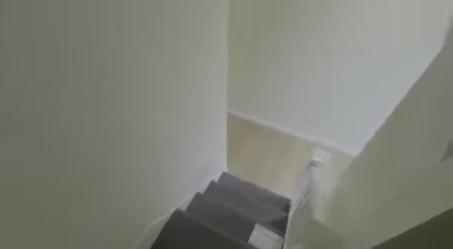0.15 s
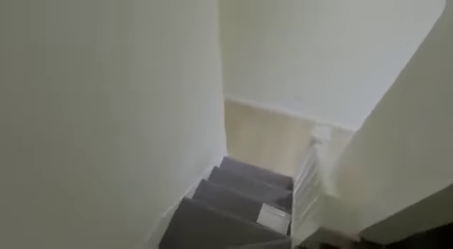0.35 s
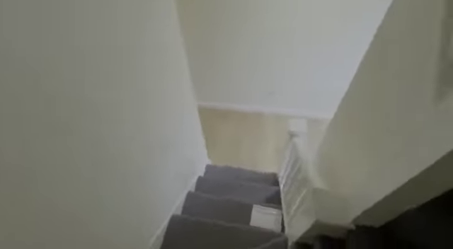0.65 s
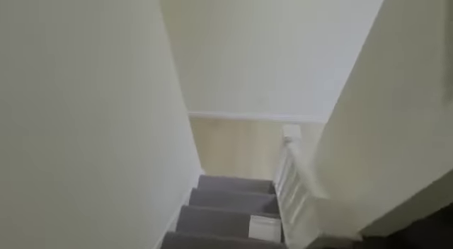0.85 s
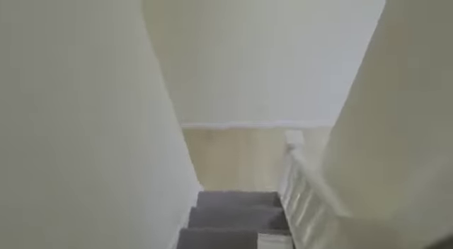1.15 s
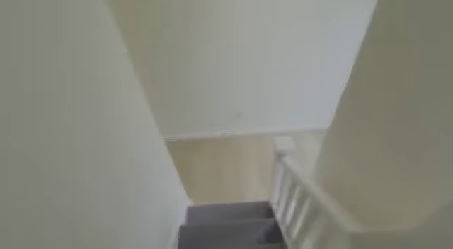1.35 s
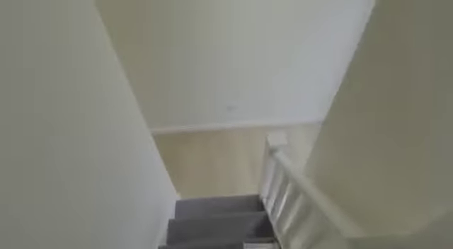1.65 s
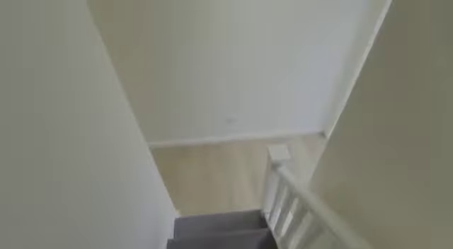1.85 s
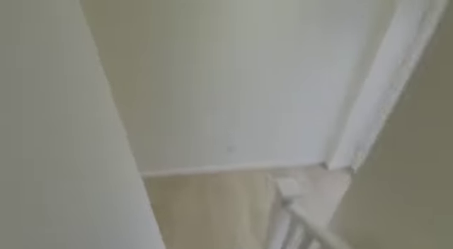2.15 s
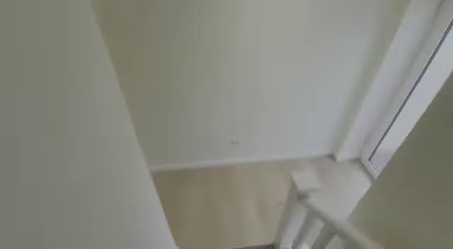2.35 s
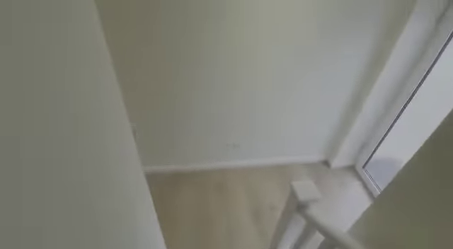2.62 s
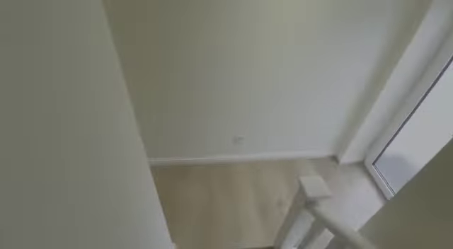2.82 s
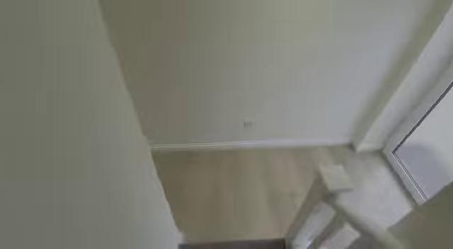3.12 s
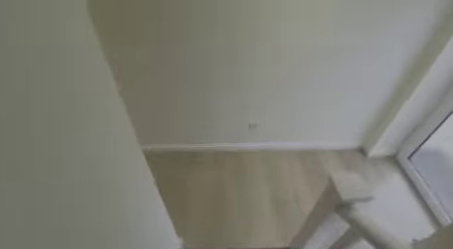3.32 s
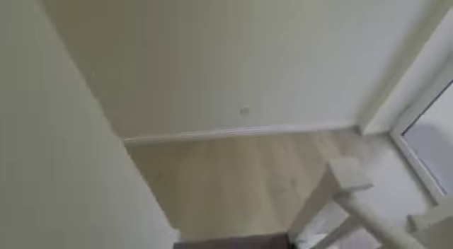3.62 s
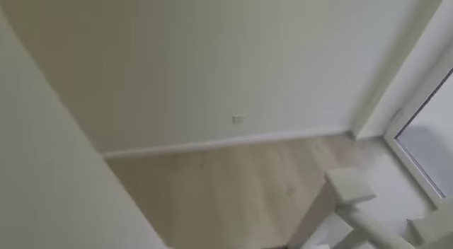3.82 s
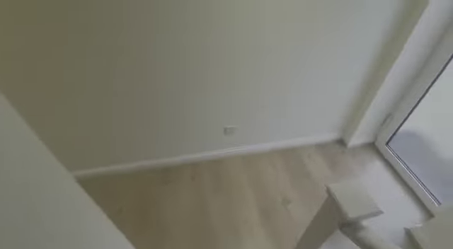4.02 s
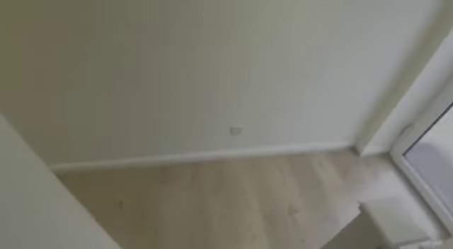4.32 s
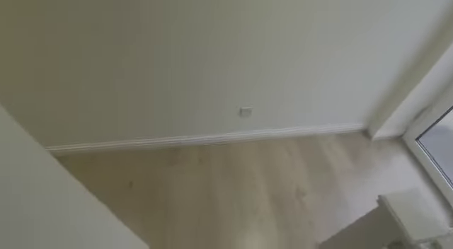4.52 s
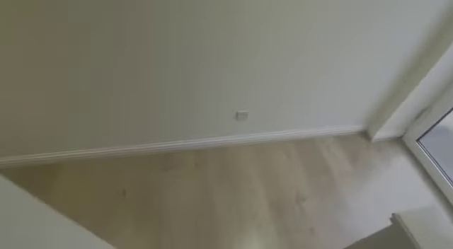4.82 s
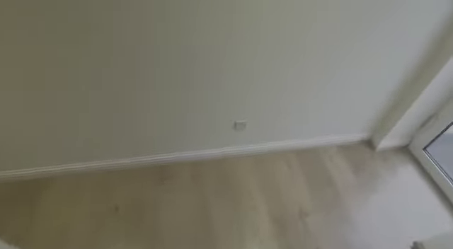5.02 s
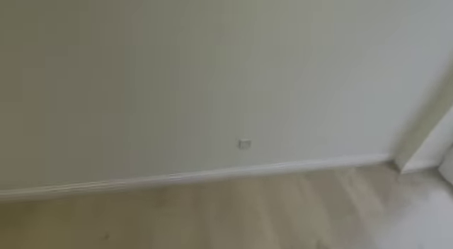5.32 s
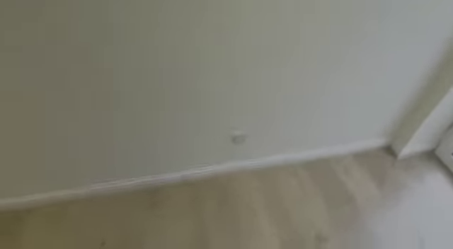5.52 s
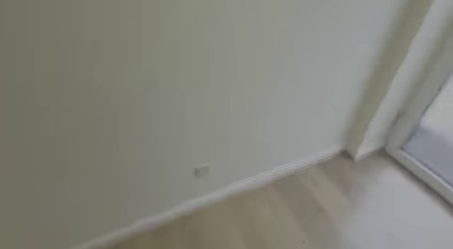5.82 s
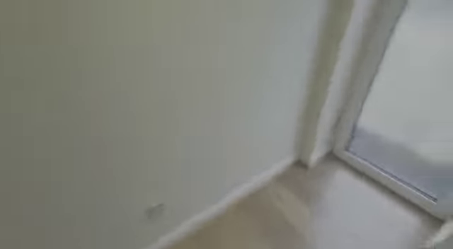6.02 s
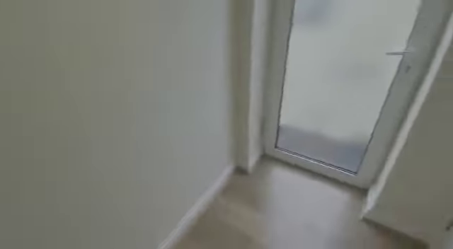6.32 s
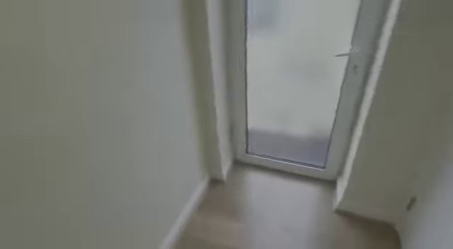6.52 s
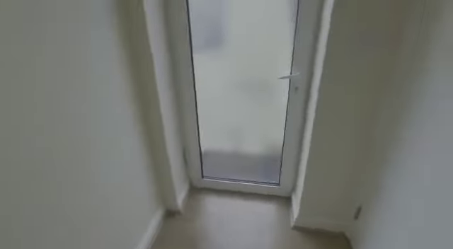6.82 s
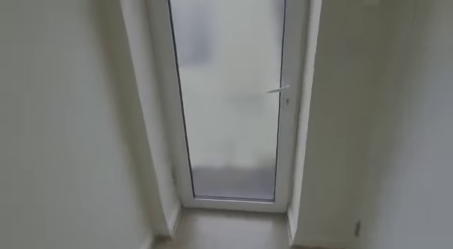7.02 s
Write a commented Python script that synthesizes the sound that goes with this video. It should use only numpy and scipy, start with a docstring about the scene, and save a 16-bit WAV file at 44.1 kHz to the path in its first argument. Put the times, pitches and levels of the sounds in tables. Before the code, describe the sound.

Slow heavy soft-soled footsteps thud down hollow carpeted wooden stairs, with cloth swish between them, then knock onto a hard floor in a bare, echoing hallway.

```python
"""Someone walks down carpeted wooden stairs into a bare hallway, carrying two microphone ports.
Each toe or heel contact sums a swinging thud, a board knock, timber ring, an air slap and a noisy crack,
and excites octave-band noise tails of the hall. Shifting weight drives the timber modes with noise;
cloth and carpet swish as grainy coloured noise; a sole squeaks; quiet house and microphone hiss lie beneath."""
import sys
import numpy as np
from scipy import signal
from scipy.fft import rfft, irfft, next_fast_len
from scipy.io import wavfile
from scipy.ndimage import uniform_filter1d

SR = 44100
rng = np.random.default_rng(int(sys.argv[2]) if len(sys.argv) > 2 else 0)


def unload_wav(signal):
    """Save mono or channel-first audio to the path in sys.argv[1] as 16-bit WAV at rate SR, clipped to [-1, 1]."""
    wavfile.write(
        sys.argv[1],
        SR,
        np.round(np.clip(np.atleast_2d(signal).T, -1, 1) * 32767).astype(np.int16),
    )


N = 315315
HALLWAY_S = 5.6  # the walker is off the stairs from here


def undb(db):
    """Gain of a level in dB."""
    return 10 ** (np.asarray(db) / 20)


def unit(x):
    """Scale to rms 1."""
    return x / np.sqrt(np.mean(x ** 2))


def peak(x, db):
    """Scale to a peak level."""
    return undb(db) * x / np.abs(x).max()


def add(out, x, s):
    """Mix x into out from time s."""
    i = int(s * SR)
    out[..., i:i + x.shape[-1]] += x[..., :out.shape[-1] - i]


def colour(x, table, share=1):
    """Filter by (f/Hz, level/dB) points joined on a log-frequency axis; share scales the dB."""
    hz, db = np.transpose(table)
    size = next_fast_len(x.shape[-1] + 4096, True)
    bins_hz = np.maximum(np.arange(size // 2 + 1) * SR / size, 1)
    gain = undb(share * np.interp(np.log(bins_hz), np.log(hz), db))
    return irfft(rfft(x, size) * gain, size)[..., :x.shape[-1]]


def spread(mid, side):
    """Two ports share the bass and hear unrelated treble: side enters with opposite signs."""
    # port difference relative to the shared part: f/Hz, level/dB
    apart = [(60, -10.5), (110, -23.5), (200, -8), (380, -8), (700, -3.5), (1290, 1), (2380, 0),
             (4400, 0.5), (8120, 0.5), (15000, 0)]
    return mid + colour(side, apart) * np.array([[1], [-1]])


def swell_in(t, rise_s):
    """Exponential rise from 0 to 1."""
    return 1 - np.exp(-t / rise_s)


def walk(rate_hz):
    """Random levels held 1 / rate_hz and slewed twice; rms 1."""
    k = int(SR / rate_hz)
    held = np.repeat(rng.standard_normal(N // k + 1), k)
    slewed = uniform_filter1d(uniform_filter1d(held, k), k)
    return unit(slewed[:N])


def swells(start_s, hold_s, rise_db_s, fall_db_s, level_db, rest_db):
    """Gain over time: every event rises to its level by its start, holds and fades; powers add."""
    t = np.arange(0, N + 64, 64)[:, None] / SR
    before_s = np.maximum(start_s - t, 0)
    after_s = np.maximum(t - start_s - hold_s, 0)
    drop_db = rise_db_s * before_s + fall_db_s * after_s
    gain = np.sqrt((undb(level_db - drop_db) ** 2).sum(1) + undb(rest_db) ** 2)
    return np.interp(np.arange(N) / SR, t[:, 0], gain)


def hall(gap_s, early_db, early_s):
    """Returns a maker of echo tails, a new one for each spot: every octave of noise dies at its own pace."""
    # hall reverberation by octave: f/Hz, t60/s
    octave_decays = [(31, 0.24), (62, 0.45), (125, 0.43), (250, 0.49), (500, 0.49), (1000, 0.56),
                     (2000, 0.59), (4000, 0.73), (8000, 0.65), (16000, 0.059)]
    t = np.arange(SR * 5 // 8) / SR
    ratios = [1 / 2, 1 / 1.8, 1 / 1.41, 1 / 1.2, 1, 1.2, 1.41, 1.8, 2]
    skirt_db = [-60, -13, -3, -.8, 0, -.8, -3, -13, -60]
    # close walls answer first, in a dense cluster above the long tail
    early = undb(early_db) * np.exp(-t / early_s)
    octaves, fades = [], []
    for hz, t60_s in octave_decays:
        band = [(hz * ratio, db) for ratio, db in zip(ratios, skirt_db)]
        octaves.append(spread(*colour(rng.standard_normal((2, 2 * SR)), band)))
        late = np.exp(-np.log(1000) * t / t60_s)
        fades.append((late + early) * swell_in(t, gap_s))
    octaves, fades = np.array(octaves), np.array(fades)[:, None]

    def tail():
        """One tail from a random stretch of the noise, unit mean energy per port."""
        i = rng.integers(SR)
        x = (octaves[..., i:i + len(t)] * fades).sum(0)
        return x / np.sqrt(np.sum(x ** 2) / 2)
    return tail


def reverb(x, tail):
    """Mono sound through a new echo tail to both ports."""
    return signal.fftconvolve(x[None], tail(), axes=1)


def timber(s, scatter_db, above_hz):
    """Ring of the modes after one push; every spot excites them in its own shares, signs and detuning."""
    # timber and air column of the stairwell: f/Hz, level on stairs/dB, level in hallway/dB, t60/s
    modes = [(42.7, -5, 4.5, 0.13), (60, -1, -20, 0.3), (85.5, 0.5, 4.5, 0.095), (113, -1, 2.5, 0.14),
             (132, 1.5, -15.5, 0.087), (138.7, -9, 4, 0.15), (156.26, -4.5, 1, 0.45),
             (210.5, -6, -4.5, 0.38), (247.6, -9, -8, 0.23), (267, -11, -9, 0.081), (288.2, -5.5, -6, 0.19),
             (319.6, -17.5, -4.5, 0.17), (381.5, -11.5, -6.5, 0.13), (408.4, -9.5, -6, 0.15),
             (446.5, -7.5, -19, 0.083), (484.4, -9.5, -4.5, 0.077), (573.4, -11, -22, 0.12),
             (698, -11, -6, 0.038)]
    hz, stairs_db, hall_db, t60_s = np.array(modes).T[:, :, None]
    level_rnd, sign_rnd, tune_rnd = rng.standard_normal((3, len(hz), 1))
    level_db = hall_db if s > HALLWAY_S else stairs_db
    gain = undb(level_db + scatter_db * level_rnd) * np.sign(sign_rnd)
    gain = gain / (1 + (above_hz / hz) ** 4)  # favours modes above above_hz
    t = np.arange(SR // 3) / SR
    decay = np.exp(-np.log(1000) * t / t60_s)
    swing = np.sin(2 * np.pi * hz * (1 + 0.024 * tune_rnd) * t)
    return (gain * decay * swing).sum(0)


def house():
    """Quiet house and microphone hiss: coloured noise whose level wanders slowly."""
    # house and hiss spectrum: f/Hz, level/dB
    house_spectrum = [(12, -64), (20, 13.5), (65, 4.5), (141, 4.5), (233, -5.5), (300, -6), (482, -15.5),
                      (603, -41), (843, -47), (969, -29.5), (2120, -23), (5620, -40), (11000, -36),
                      (15800, -85)]
    noise = spread(*rng.standard_normal((2, N)))
    return unit(colour(noise, house_spectrum)) * undb(-58 + 2.5 * walk(rate_hz=3))


def rubs():
    """Cloth and carpet swish in fine grains: a dull and a bright band of noise swell separately."""
    # cloth or carpet rubs: start/s, hold/s, rise/(dB/s), swish level/dB, hiss level/dB
    rub_events = [(0.076, 0.15, 120, -62.5, -65.5), (0.224, 0.035, 150, -59, -59.5),
                  (0.414, 0.055, 100, -77, -56.5), (0.587, 0.086, 100, -80, -71),
                  (1.095, 0.078, 900, -73, -62.5), (1.226, 0.093, 300, -53.5, -60.5),
                  (1.46, 0.071, 100, -73, -72), (1.61, .12, 100, -83, -79), (2.0, 0.044, 400, -84, -96),
                  (2.136, 0.073, 500, -76, -65), (2.26, 0.084, 110, -59, -62.5),
                  (2.451, 0.057, 90, -84, -61.5), (2.59, 0.11, 100, -79, -70), (2.785, 0.16, 78, -77, -64),
                  (3.025, 0.11, 302.5, -57.5, -81), (3.196, 0.14, 500, -60.5, -58),
                  (3.426, .02, 100, -60.5, -72), (3.58, .03, 68, -82, -66), (3.66, 0.068, 102, -66.5, -80),
                  (3.801, .015, 149, -64.5, -69.5), (3.997, 0.083, 300, -66, -84),
                  (4.163, 0.062, 150, -58, -72), (4.27, 0.076, 100, -53, -65.5),
                  (4.46, 0.053, 80, -60.5, -61.5), (4.593, 0.031, 80, -64, -65),
                  (4.747, 0.061, 100, -70, -70), (4.843, 0.048, 100, -63, -70.5),
                  (5.0, 0.17, 100, -75.5, -87), (5.21, 0.018, 500, -51, -55), (5.312, 0.03, 400, -47, -60),
                  (5.566, 0.059, 60, -82, -67.5), (5.793, 0.22, 55, -67, -95),
                  (6.058, .012, 3000, -59, -61), (6.197, 0.017, 200, -54.5, -70),
                  (6.347, 0.081, 500, -54, -55), (6.55, 0.017, 111, -73, -73),
                  (6.755, 0.087, 70, -66.5, -73), (6.945, 0.011, 900, -71, -58),
                  (7.01, .04, 100, -66, -65.5)]
    # spectrum of the rubbing: f/Hz, level/dB
    swish_spectrum = [(290, -21), (500, -0.5), (649, -7), (718, -7.5), (931, -6), (1030, -9), (1260, -7),
                      (2420, -7), (3000, -8.5), (3730, -8), (5920, -16.5), (11700, -17), (15800, -23.5)]
    fall_db_s, swish_rest_db, hiss_rest_db = 113, -89.5, -79.5
    s, hold_s, rise_db_s, swish_db, hiss_db = np.transpose(rub_events)
    swish = swells(s, hold_s, rise_db_s, fall_db_s, swish_db, swish_rest_db)
    hiss = swells(s, hold_s, rise_db_s, fall_db_s, hiss_db, hiss_rest_db)
    grain = undb(1.37 * walk(500) + 1.6 * walk(24.586))
    cloth = colour(spread(*rng.standard_normal((2, N))), swish_spectrum) * grain
    dull = unit(colour(cloth, [(4500, -28.5), (7000, -35)])) * swish
    bright = unit(colour(cloth, [(4500, -25.0), (7000, -17.5)])) * hiss
    return dull + bright


def shifting_weight():
    """Weight rolling onto treads: noise shakes the low and the high timber modes."""
    # weight shifts: start/s, hold/s, rumble level/dB, groan level/dB
    shift_events = [(0.047, 0.026, -43, -51), (0.237, 0.026, -48.5, -46.5), (0.443, 0.041, -54.5, -74),
                    (0.82, 0.038, -61, -70), (1.22, 0.049, -42.5, -46.5), (1.956, 0.056, -52, -77),
                    (2.195, 0.043, -36, -48.5), (2.754, 0.31, -59, -67), (3.124, 0.21, -42, -42.5),
                    (3.602, 0.35, -58, -64.5), (4.176, 0.09, -41.5, -45), (4.578, 0.11, -59.5, -62),
                    (5.004, 0.021, -63, -45.5), (5.12, .04, -60, -48.5), (5.257, 0.11, -43, -42),
                    (5.452, .05, -48, -68), (5.818, 0.04, -70, -50.5), (5.93, 0.045, -66, -49.5),
                    (6.01, 0.16, -43.5, -45.5), (6.31, 0.097, -52, -54), (6.768, 0.038, -52, -42.5),
                    (6.926, 0.17, -47, -54)]
    rise_db_s, fall_db_s, rumble_rest_db, groan_rest_db = 347, 101, -65.5, -71.5
    s, hold_s, rumble_db, groan_db = np.transpose(shift_events)
    deep = swells(s, hold_s, rise_db_s, fall_db_s, rumble_db, rumble_rest_db)
    creaky = swells(s, hold_s, rise_db_s, fall_db_s, groan_db, groan_rest_db)

    def shaken(place_s):
        noise = rng.standard_normal(N)
        return unit(signal.fftconvolve(noise, timber(place_s, scatter_db=2.0, above_hz=14))[:N])

    # crossfade from stairs to hallway modes over 0.3 s
    on_stairs = np.clip((HALLWAY_S - np.arange(N) / SR) / .3, 0, 1)
    shake = on_stairs * shaken(0) + (1 - on_stairs) * shaken(N)
    low = unit(colour(shake, [(20, 13), (35, 14), (110, 18.5), (150, -32)]))
    high = unit(colour(shake, [(110, -22), (150, 2), (450, -3), (750, -8.5)]))
    rumble = low * deep * undb(1.5 * walk(42))
    groan = high * creaky * undb(2.0 * walk(30))
    return rumble + groan


def squeaks(tail):
    """A sole slipping on the tread edge: random slips ring a narrow band that chirps upward."""
    # squeaks: t/s, f/Hz, length/s, level/dB
    slip_events = [(5.201, 3450, 0.0212, -47.5)]
    out = np.zeros((2, N))
    for s, hz, length_s, db in slip_events:
        t = np.arange(int(length_s * SR)) / SR
        slips = uniform_filter1d(rng.standard_normal(len(t)), size=60) + 0.098
        # f runs from 0.9 to 1.05 of hz
        chirp = np.sin(2 * np.pi * hz * (.9 * t + 0.075 * t ** 2 / length_s))
        x = undb(db) * unit(slips * np.hanning(len(t)) * chirp)
        add(out, x, s)
        add(out, undb(-6) * reverb(x, tail), s)
    return out


def crack(t, crack_db, treble_db):
    """Sharp mono edge within a decaying two-port crunch of pile or grit, which starts just before it."""
    # crack spectrum: f/Hz, level/dB
    crack_spectrum = [(300, 4), (700, -4), (1500, 7.5), (2500, 3), (4500, -4), (7000, -17.5),
                      (11000, -22.5), (16000, -33)]
    edge_db, crunch_decay_s = 1, 0.0064  # edge relative to crunch; 1/e time
    shades = [(2500, 0), (9000, treble_db)]  # a softer surface takes the treble
    click = 1. * (np.arange(len(t)) == 40)
    edge = colour(colour(click, crack_spectrum), shades)
    noise = rng.standard_normal((2, len(t)))
    grain_db = 1.7 * rng.standard_normal(len(t) // 50 + 1).repeat(50)[:len(t)]
    grains = noise * undb(grain_db) * np.exp(-t / crunch_decay_s)
    crunch = colour(colour(grains, crack_spectrum), shades)
    return -peak(edge, crack_db + edge_db), peak(crunch, crack_db)


def steps(tail):
    """Thud, knock and crack of every contact, each heard direct and through the hall from its own spot."""
    # foot contacts: t/s, thud level/dB, thud f/Hz, thud t60/s, knock peak level/dB, knock f/Hz,
    # crack peak level/dB, crack treble/dB, echo level/dB
    contacts = [(0.04, -27.5, 92, 0.18, -44.5, 236, -52, 3, 2.5),
                (0.069, -45, 94, .1, -55, 400, -48, 13, -8),
                (0.103, -35, 94, 0.069, -36.5, 246, -46.5, -17, -4.5),
                (0.134, -22.5, 79.4, 0.078, -48, 265, -47, -10, 1.5),
                (0.208, -15.5, 162, 0.044, -23, 396, -30, 1, -4.5),
                (0.234, -28.5, 121, .12, -27, 360, -31.5, 5, -5),
                (0.849, -44, 112, 0.13, -54, 280, -65, -4, -4),
                (0.958, -45, 98.5, 0.091, -61, 288, -60, 2, 4),
                (1.083, -22, 116, 0.07, -32.5, 477, -35.5, -11, 2.5),
                (1.133, -14.5, 101, 0.07, -29.5, 273, -38, -5, 0.5),
                (1.223, -26.5, 135, .093, -23, 517, -28, -4, -2),
                (1.962, -34.5, 122, 0.074, -47, 404, -55.5, -16, -1.5),
                (2.038, -39, 91.5, 0.22, -54, 280, -59, -6, -7),
                (2.116, -26, 156, .13, -31, 413, -42.5, -34, 0.5),
                (2.144, -20, 146, 0.12, -44, 510, -53, -1, -5),
                (2.18, -29.5, 160, 0.056, -37, 370, -53.5, -3, 6),
                (2.304, -34, 45.3, 0.27, -42, 515, -37, 5, -6),
                (2.379, -34, 57.6, 0.15, -60, 250, -58, -6, -6),
                (2.889, -37, 102.5, 0.089, -50.5, 294, -75, -4, 3),
                (2.974, -17.5, 106, 0.11, -27.5, 343, -32.5, 0, 0.5),
                (3.067, -14, 99, 0.087, -28.5, 314, -37, 0, -1),
                (3.15, -23, 113, .13, -36, 315, -41.5, 4, 2.5),
                (3.198, -23.5, 106.6, 0.12, -32.5, 246, -37.5, 5, -7),
                (3.309, -12.5, 153, 0.031, -25, 497, -37, -12, 2),
                (3.975, -35.5, 143, 0.089, -44, 398, -75, -3, 3),
                (3.998, -47, 140, .1, -63, 400, -61, 12, -8),
                (4.061, -27.5, 142, 0.045, -35, 460, -72, -6, -0.5),
                (4.118, -25.5, 164, 0.061, -44, 302, -64, -8, -1.5),
                (4.151, -29, 74, 0.12, -36.5, 380, -49, -6, 4),
                (4.184, -27, 138, 0.15, -30.5, 422, -36, -23, -2),
                (4.345, -37, 45.7, .18, -57, 463, -39.5, 10, -1),
                (5.178, -24.5, 70, 0.17, -42, 245, -50, 2, 8),
                (5.208, -23, 90, 0.1, -50, 252, -34.5, 4.5, 3.5),
                (5.234, -18, 53.7, 0.08, -39, 286, -28.5, 15, 0.5),
                (5.307, -27, 46, 0.1, -29, 503, -32.5, 11, 0),
                (5.321, -28, 145, 0.16, -24, 274, -31, 17, -4),
                (6.062, -21.5, 163, 0.15, -17.5, 248, -19, 8, 3),
                (6.195, -23, 113, .19, -29, 313, -33, -17, -2.5),
                (6.273, -32, 97, 0.19, -41.5, 270, -44, -7, -4),
                (6.439, -38.5, 166, 0.072, -44, 405, -39.5, 16, -1),
                (6.732, -28.5, 152.8, 0.22, -24.5, 290, -39.5, -32, 3),
                (6.928, -23, 155, 0.087, -28.5, 275, -41.5, -24, -2),
                (6.939, -25.5, 150, 0.21, -38.5, 250, -35, 3, 0),
                (7.028, -50, 150, 0.11, -60, 400, -47, 26, -10),
                (7.063, -32, 54, .088, -38.5, 750, -39, -27.5, -4.5)]
    # relative to: mean of knock and crack; knock; thud
    slap_db, ring_db, boom_db = -9.5, -7, -10.5
    pan_db = -3  # crack, left minus right
    pan = undb([[pan_db / 2], [-pan_db / 2]])
    out = np.zeros((2, N))
    t = np.arange(SR // 3) / SR
    for s, thud_db, hz, t60_s, knock_db, knock_hz, crack_db, treble_db, echo_db in contacts:
        # a soft sole loads the tread over 0.74 cycle while the tread swings and decays
        swell = np.minimum(t * hz / 0.74, 1) * np.exp(-np.log(1000) * t / t60_s)
        thud = undb(thud_db) * swell * np.sin(2 * np.pi * hz * t)
        # gradual push: rings the timber without a click
        soft = swell_in(t, 0.0025)
        ring = peak(soft * timber(s, scatter_db=3.5, above_hz=180), knock_db + ring_db)
        # the thud also sets the deep modes booming
        boom = peak(swell_in(t, 0.0011) * timber(s, scatter_db=3, above_hz=47), thud_db + boom_db)
        ring = ring + boom
        # the board under the sole knocks, 1/e in 0.58 cycle
        knock = np.exp(-t * knock_hz / 0.58) * np.sin(2 * np.pi * knock_hz * t)
        knock = peak(soft * knock, knock_db)
        # the flat of the sole slaps the air out from under it
        slap = soft * np.exp(-t / 0.00083) * np.sin(2 * np.pi * 660 * t)
        slap = peak(slap, (knock_db + crack_db) / 2 + slap_db)
        edge, crunch = crack(t, crack_db, treble_db)
        # the straight path keeps the finest treble of the edge
        tick = colour(edge, [(4000, -3), (8000, 6)])
        direct = thud + ring + knock + slap + (tick + crunch) * pan
        to_hall = undb(0.5) * (thud + ring) + undb(3.5) * knock + undb(11.5) * slap + undb(10) * edge
        add(out, direct, s)
        add(out, undb(echo_db) * reverb(to_hall, tail), s)
    return out


def scene():
    """Steps, squeaks and shifting weight, dry and through the hall, with dry rubs over the house."""
    tail = hall(gap_s=0.0031, early_db=3.0, early_s=0.045)
    shake = shifting_weight()
    shake_echo = undb(-5) * reverb(shake, tail)[:, :N]
    return house() + rubs() + shake + shake_echo + squeaks(tail) + steps(tail)


def record(dry):
    """The two ports colour the sound differently; deepest bass and top are cut."""
    # port response, left minus right: f/Hz, level/dB
    port_difference = [(60, -0.5), (110, -1), (200, 0), (380, -2), (700, -2), (1290, -4.5), (2380, -9.5),
                       (4400, 2.5), (8120, -0.5), (15000, -4.5)]
    low_cut = signal.butter(2, 28, "high", fs=SR, output="sos")
    top_cut = signal.ellip(10, .2, 80, 15750, fs=SR, output="sos")
    dry = signal.sosfilt(low_cut, dry)
    left = colour(dry[0], port_difference, share=.5)
    right = colour(dry[1], port_difference, share=-.5)
    return signal.sosfilt(top_cut, np.array([left, right]))


dry = scene()
out = record(dry)
unload_wav(out)
```